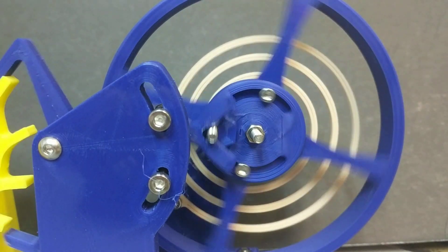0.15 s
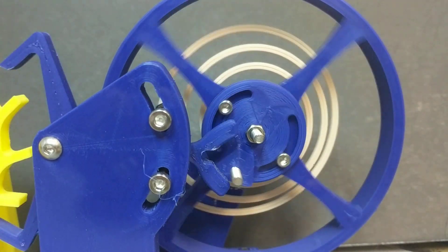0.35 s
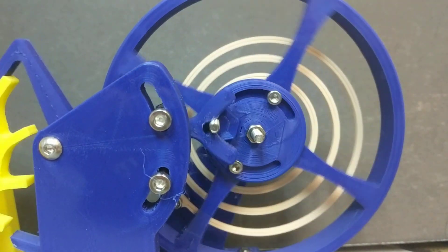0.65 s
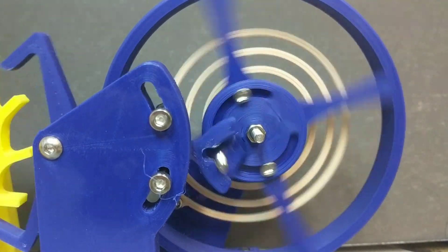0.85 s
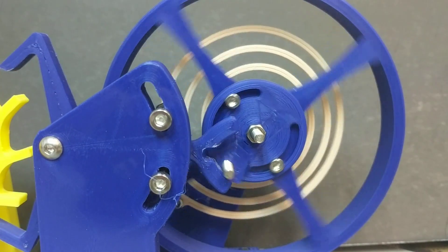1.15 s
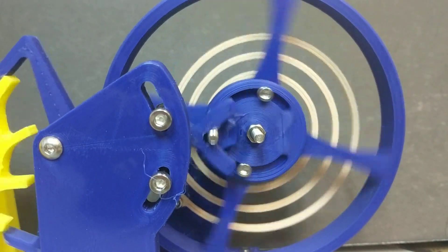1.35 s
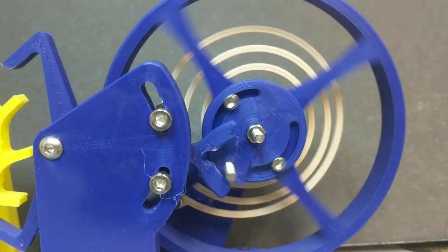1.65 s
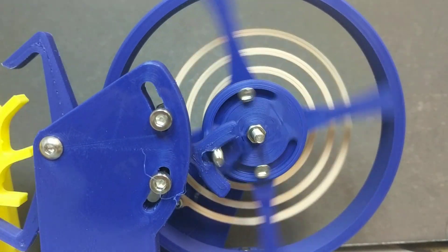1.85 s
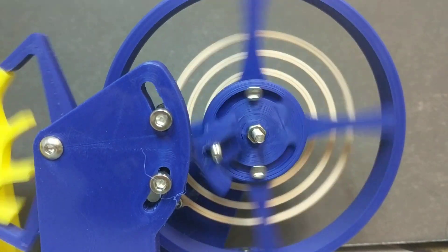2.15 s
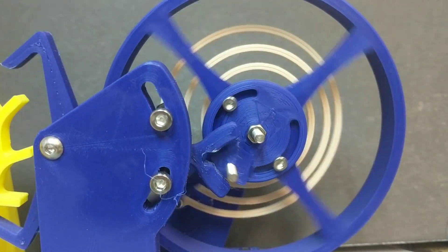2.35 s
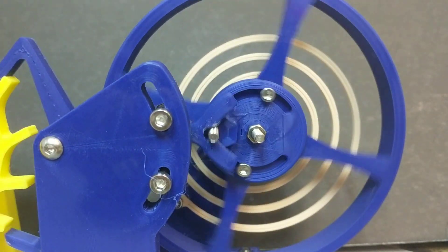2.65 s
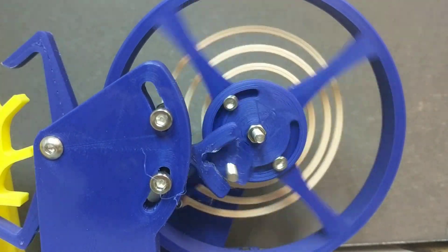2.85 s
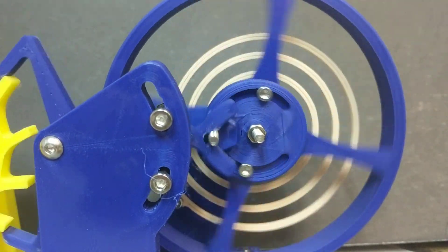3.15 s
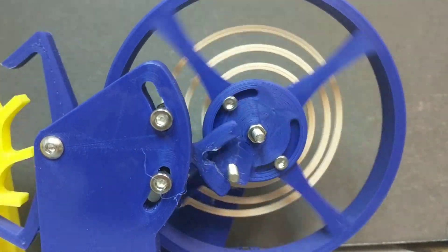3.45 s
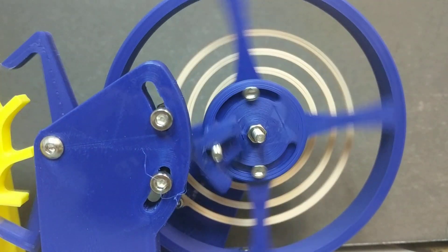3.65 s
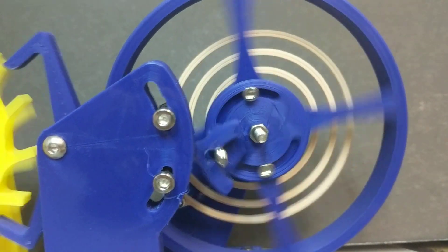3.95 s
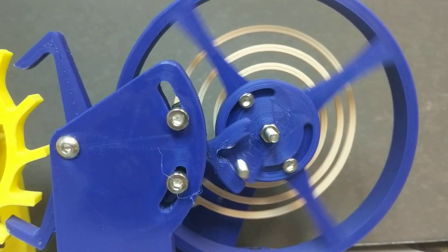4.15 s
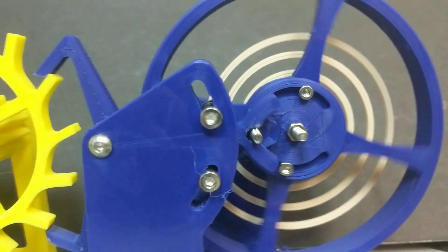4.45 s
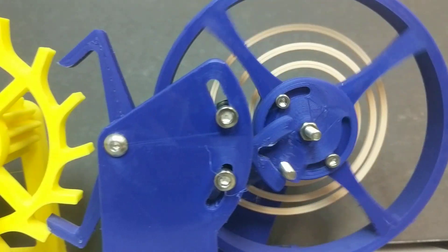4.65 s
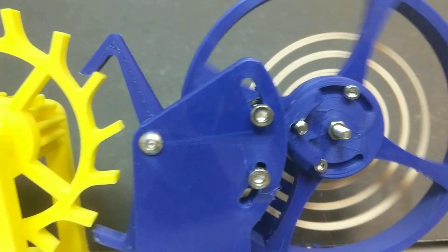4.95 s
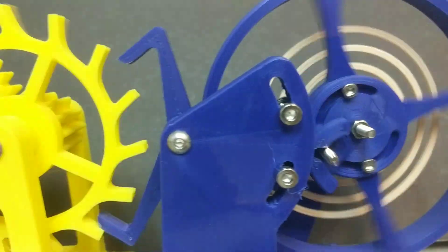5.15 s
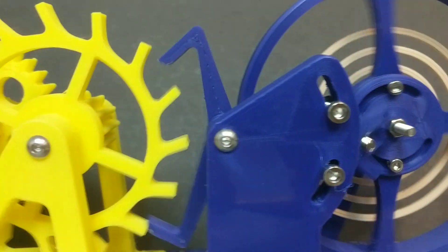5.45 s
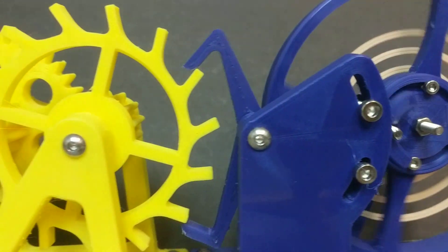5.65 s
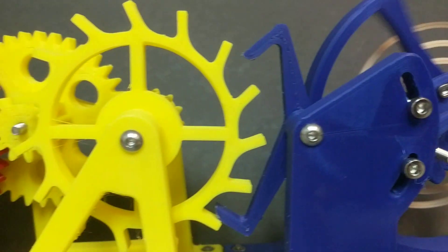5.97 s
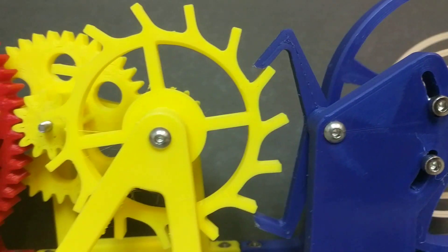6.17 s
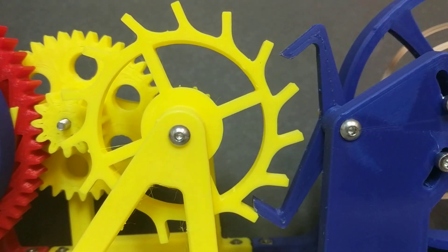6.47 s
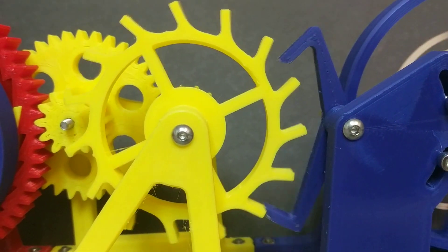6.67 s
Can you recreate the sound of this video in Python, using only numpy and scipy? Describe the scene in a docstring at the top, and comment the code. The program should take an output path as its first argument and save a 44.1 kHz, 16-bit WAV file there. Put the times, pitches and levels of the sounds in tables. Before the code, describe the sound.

Steady plastic tick-tock from an escape wheel and swinging balance, heard very near in a small, dry room. Every swing gives a light pre-tap and two quick clicks, the second strongest, bright and rattly with hardly any ring. The table answers with dull little thumps. Between beats lie faint ticks, irregular low rumbling, quiet hiss and a wavering thin whine; a soft rustle grows later, then fades near the end.

```python
"""At a table, close to a small microphone, a plastic clock escapement beats. Each swing of the balance brings
two or three contacts: the pin meets the fork, the tooth slides free, the wheel drops hard on the pallet.
Every contact is noise filtered by plastic resonances, with decaying table modes and a diffuse room echo.
Filtered noises make a soft rumble, a rustle and a hiss; wavering sines make a thin whine that comes and goes."""
import sys
import numpy as np
from scipy import signal
from scipy.fft import rfft, irfft, next_fast_len
from scipy.io import wavfile
from scipy.ndimage import uniform_filter1d, map_coordinates

SR = 44100
rng = np.random.default_rng(int(sys.argv[2]) if len(sys.argv) > 2 else 0)


def pcm_store(signal):
    """Save signal as 16-bit PCM."""
    levels = np.round(np.clip(np.atleast_2d(signal), -1, 1) * 32767)
    wavfile.write(sys.argv[1], SR, levels.astype(np.int16).T)


N = 300321  # samples


def amp(db):
    """Decibel law: level in dB to amplitude gain."""
    return 10 ** (np.asarray(db) / 20)


def unit(x):
    """Power normalisation: scale to rms 1."""
    return x / np.sqrt(np.mean(x ** 2) + 1e-20)


def along(points, hz):
    """Logarithmic pitch scale: interpolate (f/Hz, value) points over log frequency."""
    f, v = np.transpose(points)
    return np.interp(np.log(hz + 1), np.log(f + 1), v)


def curves(rows):
    """Slow modulation: interpolate each column after t/s to one value per sample."""
    s, *columns = np.transpose(rows)
    return [np.interp(np.arange(N) / SR, s, column) for column in columns]


def wobble(rate):
    """Band-limited fluctuation: a smooth curve through random knots, rate knots a second."""
    knots = rng.standard_normal(int(N * rate / SR) + 4)
    return map_coordinates(knots, [np.arange(N) * rate / SR])


def filtered(x, response):
    """Linear filtering: multiply the spectrum of x by a complex response of frequency."""
    n = x.shape[-1]
    m = next_fast_len(n + 8192)  # zero padding
    return irfft(rfft(x, m) * response(np.fft.rfftfreq(m, 1 / SR)), m)[..., :n]


def coloured_noise(spectrum):
    """Spectral shaping: white noise filtered to (f/Hz, level/dB) points, rms 1."""
    return unit(filtered(rng.standard_normal(N), lambda hz: amp(along(spectrum, hz))))


def background():
    """Modulated stationary noise: lumpy table rumble and judder, flickering rustle and smooth hiss."""
    # noise spectra before scaling to rms 1: f/Hz, spectrum level/dB
    deep_spectrum = [(15, -50), (30, -13), (50, 7.5), (62, 17), (80, 4), (110, -56)]
    rumble_spectrum = [(45, -40), (75, 1), (110, 2), (135, 5.5), (165, -4), (200, -18), (280, -45)]
    judder_spectrum = [(140, -40), (190, -2.5), (260, 0.5), (340, -3), (450, -9.5), (600, -17), (800, -53)]
    rustle_spectrum = [(600, -40), (1100, -5), (1600, 0), (2500, 0), (3000, -6), (4000, -30)]
    hiss_spectrum = [(250, -36), (400, -2), (560, -6.5), (750, -9.5), (1500, -14.5), (2500, -15.5),
                     (4200, -14), (6000, -25.5), (9000, -25.5), (13500, -31.5), (16500, -38)]
    # mean level of the deep rumble: t/s, level/dB
    deep_level = [(0, -54.5), (3.9, -56), (4.3, -48), (6.2, -51), (6.8, -55)]
    # mean levels in the table: t/s, rumble level/dB, judder level/dB
    table_level = [(0, -52, -59.5), (1.2, -45.5, -58), (1.57, -49, -57), (1.82, -41.5, -47),
                   (1.95, -56, -64), (2.5, -51.5, -57), (3.05, -44, -53.5), (3.36, -48, -55),
                   (3.6, -45.5, -51), (3.75, -52, -69), (4.2, -46, -57), (4.8, -47, -57),
                   (5.15, -49.5, -65), (5.4, -44.5, -52), (5.73, -47, -64), (6.1, -45, -52.5),
                   (6.57, -45.5, -60), (6.7, -57, -63)]
    # mean level of the rustle: t/s, level/dB
    rustle_level = [(0, -64), (1.2, -64.5), (2.4, -67), (2.8, -66), (3.7, -68), (4.3, -61.5), (5.1, -62),
                    (5.5, -56), (6.1, -56.5), (6.5, -73)]
    hiss_db = -56

    deep_db, = curves(deep_level)
    rumble_db, judder_db = curves(table_level)
    rustle_db, = curves(rustle_level)
    shake = wobble(20)  # the swinging balance shakes the table: irregular small jolts
    deep = amp(deep_db + 2.7 * wobble(5.4)) * coloured_noise(deep_spectrum)
    rumble = amp(rumble_db + 0.5 * shake) * coloured_noise(rumble_spectrum)
    judder = amp(judder_db + 3.3 * shake) * coloured_noise(judder_spectrum)
    rustle = amp(rustle_db + 1.9 * wobble(67)) * coloured_noise(rustle_spectrum)
    hiss = amp(hiss_db + 0.32 * wobble(4)) * coloured_noise(hiss_spectrum)
    return deep + rumble + judder + rustle + hiss


def whine():
    """Harmonic series: phase-locked partials swell and fade above a fainter, wavering low tone."""
    # mean rms levels: t/s, 1st partial level/dB, 2nd partial level/dB, 3rd partial level/dB
    low_partials = [(0.24, -59, -82, -79), (0.58, -61, -75, -73), (1.2, -61, -81, -84),
                    (1.57, -65, -72, -78), (1.9, -60, -66, -75), (2.46, -62, -65, -78),
                    (2.76, -63, -70, -81), (3.2, -62, -79, -72), (3.69, -59, -79, -71),
                    (4.15, -64, -82, -81), (4.4, -65, -75, -74), (5.1, -64, -73, -78),
                    (5.42, -62, -71, -91), (5.8, -63, -63, -90), (6.1, -63, -65, -81), (6.6, -61, -69, -90)]
    # mean peak levels: partial number, level/dB
    top_partials = [(4, -83), (5, -86), (6, -86), (7, -89)]
    whine_hz, hum_hz = 2165.5, 560  # mean frequencies

    phase = 2 * np.pi * np.cumsum(whine_hz + .8 * wobble(3)) / SR
    low = 0
    for k, db in enumerate(curves(low_partials), start=1):
        low = low + np.sqrt(2) * amp(db + 1.5 * wobble(15)) * np.sin(k * phase)
    top = sum(amp(db + 3 * wobble(3.4)) * np.sin(k * phase) for k, db in top_partials)
    hum_phase = 2 * np.pi * np.cumsum(hum_hz + 10 * wobble(25)) / SR
    hum = amp(-66.5 + 4 * wobble(13)) * np.sin(hum_phase)
    return low + top + hum


def tail(size):
    """Diffuse reverberation: noise whose frequencies decay at their own rates, at unit energy."""
    # room decay: f/Hz, t60/s
    room_decay = [(200, 0.18), (1000, 0.2), (4000, 0.15), (12000, 0.12)]
    hz, t, bins = signal.stft(rng.standard_normal(size), SR, nperseg=256)
    decay = amp(-60 * t / along(room_decay, hz)[:, None])
    x = signal.istft(bins * decay, SR, nperseg=256)[1][:size]
    return x / np.linalg.norm(x)


def knock(modes, t):
    """Modal superposition: damped table modes, varied at each blow, build up over a moment; peak rms 1."""
    x = 0
    for hz, level, t60 in modes:
        ring = amp(level + rng.normal(0, 2) - 60 * t / t60)
        pitch = hz * rng.normal(1, 0.042)
        x = x + ring * np.sin(2 * np.pi * pitch * t + rng.uniform(0, 2 * np.pi))
    x = x * (1 - np.exp(-t / 0.0032))  # the table takes a moment to move
    return x / np.sqrt(np.max(uniform_filter1d(x ** 2, size=600)))


def click(colour_db, t60, size):
    """Resonance: a blow and its light rebounds excite plastic modes; (direct, to the walls), direct peak rms 1."""
    # modes of the plastic frame, lever and wheel, mean strengths: f/Hz, level/dB
    plastic_modes = [(1030, -5), (1280, -9), (1850, -1), (2255, 1), (2605, -6), (2870, -9), (3340, -6),
                     (3620, -9), (3920, -4), (4600, -13), (5465, -4), (6050, -11), (6975, 0), (8380, -8),
                     (9750, -8), (10700, -12), (12000, -14), (12800, -13), (14200, -18)]
    # bare contact: f/Hz, level/dB
    bare_contact = [(450, -35), (950, -3), (2500, -7.5), (5000, -16), (10000, -14), (15000, -28)]
    loss = 0.031  # damping: half-power bandwidth over mode frequency

    t = np.arange(size) / SR
    spikes = rng.standard_normal((2, size)) * amp(3.03 * rng.standard_normal((2, size)))
    bounces = amp(3.5 * map_coordinates(rng.standard_normal(100), [t * 300]))  # 300 knots a second
    life = np.clip(t60, .02, .09)
    rise = 1 - np.exp(-t / 0.00056)
    blow = rise * spikes[0] * amp(-60 * t / (0.58 * life))
    chatter = rise * spikes[1] * bounces * amp(-7 - 60 * t / (1.9 * life))
    luck = rng.normal(0, 2, len(plastic_modes))  # new mode strengths, dB
    low, mid, treble, air = colour_db

    def body(f, ring_db):
        """Structural damping: each soft plastic mode loses the same share per cycle."""
        modes = 0
        for (centre, db), extra in zip(plastic_modes, luck):
            damping = 1j * f * loss * centre
            modes = modes + amp(db + extra) * damping / (centre * centre - f * f + damping)
        tilt = along([(1150, low), (2200, 0), (3900, mid), (6700, treble), (11500, air)], f)
        return (amp(ring_db) * modes + amp(along(bare_contact, f))) * amp(tilt)

    direct = filtered(blow, lambda f: body(f, 0))
    direct += filtered(chatter, lambda f: body(f, -7))  # light rebounds barely ring the parts
    away = filtered(blow + chatter, lambda f: body(f, -9))  # the modes beam less toward the walls
    away *= np.linalg.norm(direct) / np.linalg.norm(away)
    return np.array([direct, away]) / np.sqrt(np.max(uniform_filter1d(direct ** 2, size=128)))


def contacts():
    """Alternating escapement action: yield each contact's time, levels and swing-dependent tone."""
    # the pin of the balance meets the fork: t/s, click level/dB, table thud level/dB
    pins = [(0.0498, -33, -34), (0.2995, -34, -42), (0.6364, -31, -31.5), (0.89, -35, -42),
            (1.965, -34.5, -32), (1.9733, -37.5, -33.5), (2.222, -39, -47), (2.5568, -31, -29),
            (2.8049, -37, -42), (3.1472, -33, -34), (3.3878, -33.5, -38), (3.7438, -33, -37.5),
            (3.7584, -48, -28), (3.998, -35.5, -39), (4.347, -32.5, -51), (4.5932, -34, -45),
            (4.9443, -33, -35), (5.1957, -31.5, -33.5), (5.5292, -33, -34), (5.778, -40, -52),
            (6.1209, -32.5, -41), (6.128, -34, -30.5), (6.1354, -42, -42), (6.3669, -35.5, -35.5),
            (6.7181, -30, -34)]
    # the tooth slides free: t/s, click level/dB, brightness/dB, table thud level/dB, table knock level/dB
    slides = [(0.0605, -23.5, 8, -28, -30), (0.3064, -21, 0, -29, -32), (0.6561, -22, 0, -26, -27),
              (0.8984, -23, 2, -44, -30.5), (1.3845, -35.5, -14, -30.5, -39.5), (1.629, -23.5, 0, -40, -33),
              (1.9889, -20.5, -4, -38, -30), (2.23, -24, 0.5, -25.5, -32), (2.5875, -25.5, -2.5, -29, -30),
              (2.8127, -25, 0.5, -29.5, -33), (3.1866, -25, -1.5, -28, -27.5),
              (3.3949, -25.5, 2, -31.5, -36), (3.7729, -24.5, 1.5, -27.5, -30.5),
              (4.004, -25.5, 5, -25.5, -35.5), (4.3643, -22.5, -2.5, -26.5, -28.5),
              (4.5999, -24.5, -2, -29, -35.5), (4.9626, -22, 1.5, -26, -35), (5.2014, -27, -1, -27, -37),
              (5.562, -24, 0, -28, -28.5), (5.7846, -26, -1, -33, -34), (6.1495, -25.5, 1.5, -32.5, -29.5),
              (6.3735, -25.5, -2, -36, -29.5), (6.7437, -24, 3, -28, -30)]
    # the wheel drops on the pallet, forward and back swing in turn: t/s, click level/dB,
    # body near 1 kHz/dB, brightness/dB, table thud level/dB, table knock level/dB
    drops = [(0.0964, -16.5, -7, -5.5, -30, -35), (0.3488, -15, -5, -5, -26, -24.5),
             (0.69, -14.5, -3.5, -4, -28, -40), (0.942, -16.5, -0.5, 1, -26.5, -27.5),
             (1.4416, -14, 3, 3.5, -27, -47), (1.6804, -16.5, 0.5, -2.5, -26, -25.5),
             (2.0329, -14.5, 2.5, -3, -29, -34.5), (2.2771, -16.5, -3.5, -1.5, -33, -31.5),
             (2.6335, -14, 3.5, 1, -28, -40), (2.8687, -14, -2, 2, -26.5, -27),
             (3.2462, -14.5, 2.5, -1, -40, -42.5), (3.4599, -15, 3.5, 2, -24.5, -28),
             (3.8182, -15.5, 2, -1.5, -34.5, -54), (4.057, -15.5, 2.5, -2.5, -27, -31.5),
             (4.4062, -14, -8.5, -1.5, -39, -45), (4.652, -13.5, -1.5, -2, -29, -40),
             (4.9996, -15, 1.5, 0, -30.5, -35), (5.2474, -17, -4.5, -5.5, -24, -24.5),
             (5.6074, -12.5, -2, -1, -36, -50), (5.8366, -14, -10.5, -9.5, -35, -26.5),
             (6.197, -15, 1, -1.5, -37, -29.5), (6.4279, -16.5, -2.5, -3, -33, -29),
             (6.7883, -15, -10, -6, -31, -46)]
    # light touches around the drop: t/s, click level/dB, table thud level/dB
    touches = [(0.092, -32, -34), (0.3437, -34, -29.5), (0.9285, -38, -33), (0.9398, -24.5, -26),
               (1.4346, -42, -31), (1.6657, -39, -29), (2.0263, -39, -30.5), (2.264, -36, -30.5),
               (2.273, -23.5, -29), (2.6216, -45, -35), (2.855, -34, -34), (2.8649, -38, -32),
               (3.2377, -32.5, -28.5), (3.4438, -38.5, -35), (3.8108, -44, -31.5), (4.0441, -34.5, -35),
               (4.0529, -30, -27), (4.396, -41, -44), (4.4008, -48, -35), (4.6435, -32, -31),
               (4.6488, -39, -31.5), (5.026, -28, -54), (5.2354, -37, -29), (5.6016, -44, -34),
               (5.8229, -40, -36.5), (5.8293, -37, -30.5), (6.1895, -39, -34.5), (6.4119, -35, -33),
               (6.4247, -31, -25.5), (6.7806, -29.5, -33.5)]
    # faint ticks between the beats, most as the balance turns after a forward drop: t/s, click level/dB
    ticks = [(0.01, -45.5), (0.2242, -49), (0.8188, -50), (1.5607, -52), (2.157, -47.5), (2.2123, -48),
             (2.7513, -56), (3.941, -50), (3.983, -50), (4.22, -50), (4.527, -51.5), (4.5727, -51),
             (5.127, -49), (5.1773, -48), (5.756, -51)]
    # mean tones, a row for forward then back swing (ticks: one row for both):
    # near 1 kHz/dB, near 4 kHz/dB, near 7 kHz/dB, near 12 kHz/dB, nominal decay/s
    pin_tone = [(-9.5, -3, -7, -13.5, 0.054), (-4, -5, -16, -20, 0.087)]
    slide_tone = [(-7, -3.5, -6, -11, 0.041), (-3.5, 9.5, 6, -0.5, 0.035)]
    drop_tone = [(-4, 2.5, 3, 0.39, 0.025), (-2.5, 2.5, 0.5, 0.33, 0.034)]
    touch_tone = [(-10, -1, -15, -4.5, 0.061), (-2.5, -3.5, -10, -6, 0.035)]
    tick_tone = [(-2.6, -1, -11, -8, 0.055)]
    pin_knock_db, touch_knock_db = -6.5, -2.5  # table knock over thud
    tick_thump_db = -3  # table thud and knock over click
    colour_scatter_db = 2

    rows = [(s, db, 0, 0, thud, thud + pin_knock_db, pin_tone) for s, db, thud in pins]
    rows += [(s, db, 0, 0, thud, thud + touch_knock_db, touch_tone) for s, db, thud in touches]
    rows += [(s, db, 0, *rest, slide_tone) for s, db, *rest in slides]
    rows += [(*row, drop_tone) for row in drops]
    rows += [(s, db, 0, 0, db + tick_thump_db, db + tick_thump_db, tick_tone) for s, db in ticks]
    drop_s = np.array(drops)[:, 0]
    for s, db, body_db, bright_db, thud_db, knock_db, tones in rows:
        nearest_drop = np.argmin(abs(drop_s - s))  # even: forward swing, odd: back swing
        low, *high, t60 = tones[nearest_drop % len(tones)]
        colour_db = np.r_[low + body_db, np.add(high, bright_db)]
        colour_db = colour_db + rng.normal(0, colour_scatter_db, size=4)
        yield s, db, colour_db, t60, thud_db, knock_db


def escapement():
    """Impact excitation: every contact clicks, thumps the table and, by convolution, wakes the room."""
    # table modes, mean pitches and strengths, four thud modes then the knock modes: f/Hz, level/dB, t60/s
    table_modes = [(83, -10.5, 0.13), (114.8, -0.5, 0.13), (137.5, 4.5, 0.1), (166.5, 3.5, 0.094),
                   (209, -2.5, 0.072), (241, 2.5, 0.062), (295.4, -2.5, 0.059), (336.6, -5, 0.078),
                   (438, -4, 0.047), (548, -6.5, 0.032), (701, -10, 0.054)]
    out, size = np.zeros(N + SR), 8192
    t = np.arange(size) / SR
    for s, db, colour_db, t60, thud_db, knock_db in contacts():
        direct, away = amp(db) * click(colour_db, t60, size=size)
        thump = amp(thud_db) * knock(table_modes[:4], t) + amp(knock_db) * knock(table_modes[4:], t)
        echo = amp(-16.5) * signal.fftconvolve(away + amp(9) * thump, tail(size))[:size]
        start = round(s * SR)
        out[start:start + size] += direct + thump
        out[start + 200:start + 200 + size] += echo  # 4.5 ms later
    return out[:N]


def scene():
    """Superposition: room, whine and clock add at one microphone."""
    return (background() + whine() + escapement())[None]


def record(dry):
    """Band limitation: the microphone drops the deep bass and a steep low-pass ends the treble."""
    top_hz = 16000
    sound = signal.sosfilt(signal.butter(3, 45, "high", fs=SR, output="sos"), dry)
    return filtered(sound, lambda hz: 1 / (1 + (hz / top_hz) ** 100))


dry = scene()
out = record(dry)
pcm_store(out)
```